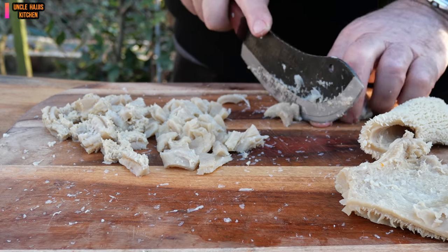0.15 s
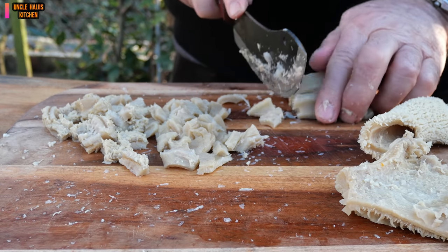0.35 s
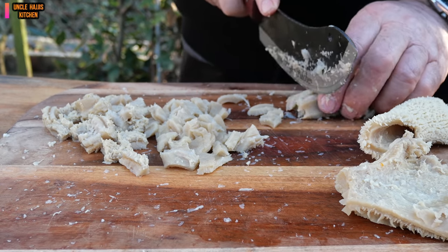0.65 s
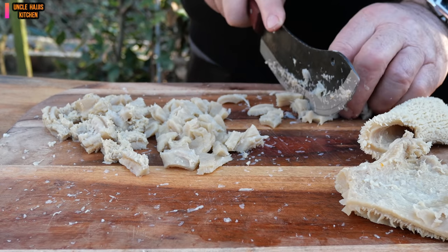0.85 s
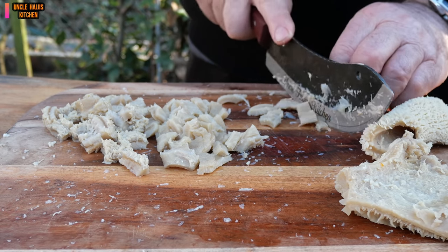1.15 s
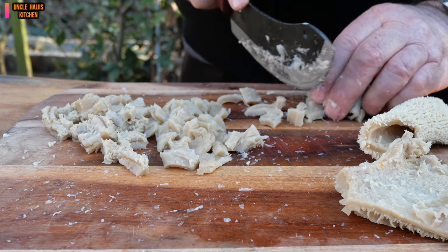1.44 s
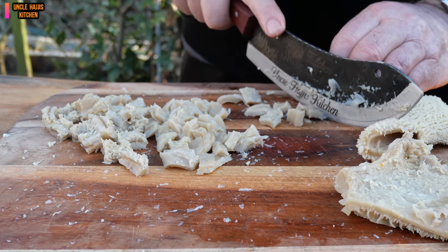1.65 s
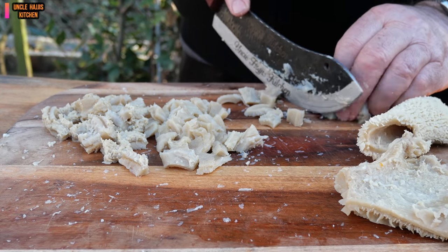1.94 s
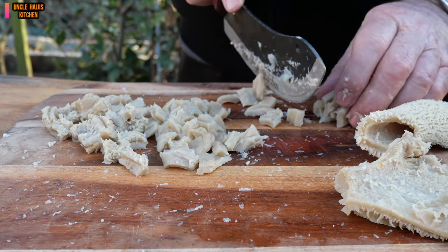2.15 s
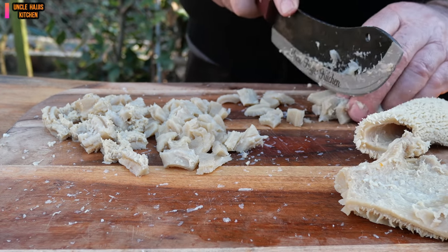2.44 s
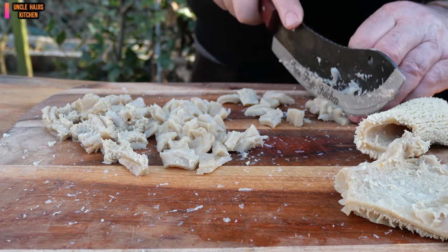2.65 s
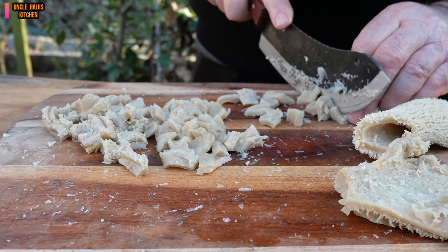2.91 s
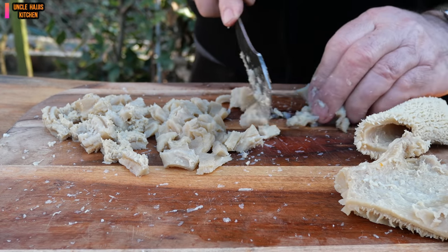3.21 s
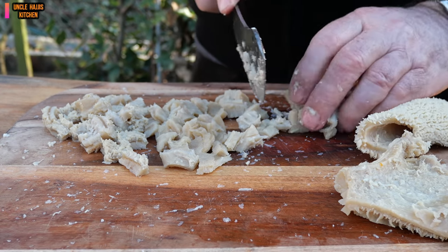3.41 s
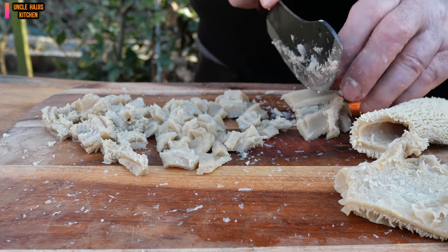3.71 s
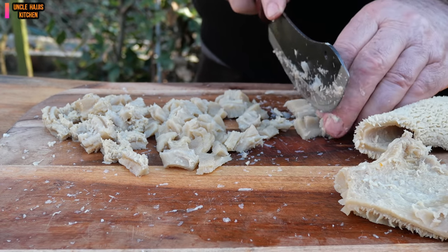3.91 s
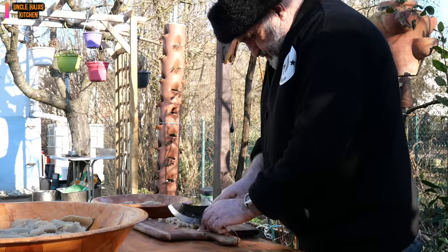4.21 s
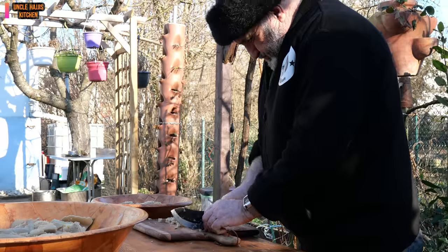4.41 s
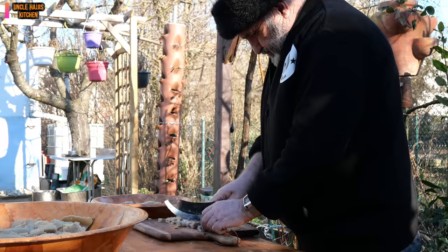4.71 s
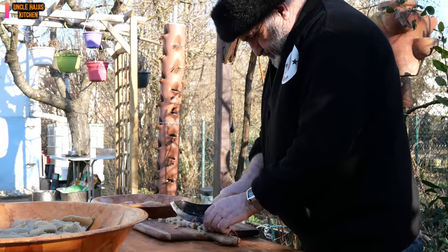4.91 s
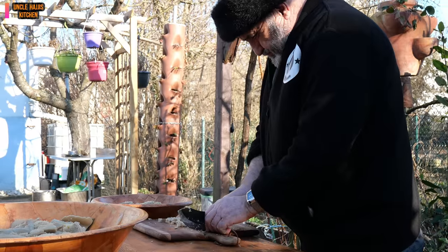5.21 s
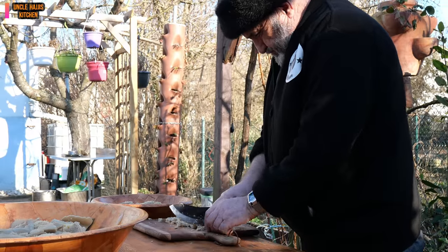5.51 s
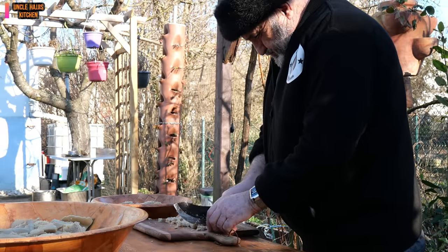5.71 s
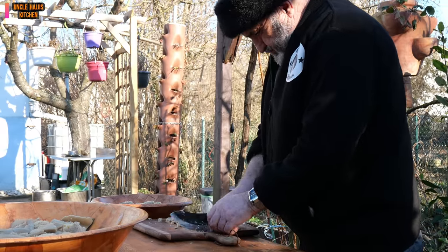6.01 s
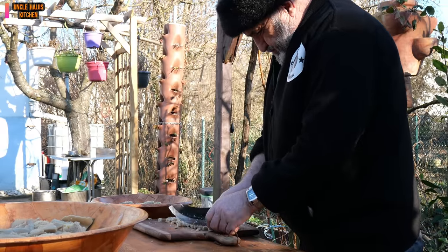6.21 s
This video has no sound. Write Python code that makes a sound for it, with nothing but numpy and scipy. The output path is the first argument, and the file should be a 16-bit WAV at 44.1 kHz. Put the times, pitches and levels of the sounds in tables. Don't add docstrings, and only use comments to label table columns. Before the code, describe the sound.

Close microphone on a chopping board: three sharp wooden knocks with a bright steel crack and a faint wall echo, separated by wet slides, pushed pieces and short scrapes. After about four seconds the perspective moves to the side, where knocks sound hollower and scraping is sparse. Quiet distant traffic and hiss continue throughout; a far vehicle swells softly near the end as the last strong chop lands, followed by a small edge press.

```python
import sys
import numpy as np
from scipy import signal
from scipy.fft import rfft, irfft
from scipy.io import wavfile
from scipy.ndimage import uniform_filter1d

SR = 44100
rng = np.random.default_rng(int(sys.argv[2]) if len(sys.argv) > 2 else 0)


def attenuation_scalar(level_db):
    decades = np.asarray(level_db, float) / 20
    return 10 ** decades


def to_wav(s):
    ch = np.atleast_2d(s).T
    pcm = np.round(np.clip(ch, -1, 1) * 32767)
    wavfile.write(sys.argv[1], SR, pcm.astype(np.int16))


N = 280035
T = np.arange(N) / SR
MOVE_S = 4.12


def unit(x):
    return x / np.sqrt(np.mean(x ** 2))


def white():
    return rng.standard_normal(N)


def colour(x, points):
    hz, db = np.transpose(points)
    log_hz = np.log(np.fft.rfftfreq(N, 1 / SR) + 1)
    gain = attenuation_scalar(np.interp(log_hz, np.log(hz), db))
    return irfft(rfft(x) * gain, N)


def band(x, lo_hz, hi_hz):
    sos = signal.butter(3, [lo_hz, hi_hz], "bandpass", fs=SR, output="sos")
    return signal.sosfilt(sos, x)


def resonate(x, hz, width_hz):
    return signal.lfilter(*signal.iirpeak(hz, hz / width_hz, fs=SR), x)


def walk(rate_hz):
    hold = int(SR / rate_hz)
    steps = np.repeat(rng.standard_normal(N // hold + 1), hold)
    return unit(uniform_filter1d(uniform_filter1d(steps, hold), hold)[:N])


def late(x, t, ms):
    return np.interp(t - ms / 1000, t, x, left=0)


def add(out, sound, s):
    i = int(s * SR)
    out[i:i + len(sound)] += sound[:N - i]


# pitch_hz, level_db (per Hz)
TRAFFIC_COLOUR = [(24, -88), (40, -56), (97, -32), (134, -22), (171, -14), (227, -11.5), (400, -2),
                  (553, -1), (599, -4), (973, -4), (1080, -6), (1370, -10.5), (2140, -24.5), (5000, -31),
                  (6500, -51), (11000, -120)]
# pitch_hz, level_db (per Hz)
HISS_COLOUR = [(1470, -34.5), (2500, -4.5), (2880, -13.5), (3600, -6), (4080, -9.5), (4410, -5), (5110, -6),
               (6550, 7), (8600, 0.5), (14800, 4), (16000, 2)]
# low_traffic_db, upper_traffic_db, hiss_db
YARD_CLOSE = (-68.5, -68.5, -74)
YARD_SIDE = (-65.5, -70, -73.5)
# time_s, level_db
ENGINE = [
    (4.13, -92),
    (4.6, -88),
    (5.5, -79),
    (5.6, -66.5),
    (5.749, -73),
    (6.099, -66),
    (6.35, -79),
]


def garden():
    close = T < MOVE_S
    low_db, upper_db, hiss_db = (np.where(close, a, b) for a, b in zip(YARD_CLOSE, YARD_SIDE))
    low_db = low_db + 6.5 * np.exp(-((T - 6.08) / 0.31) ** 2)
    engine_db = np.interp(T, *np.transpose(ENGINE))

    far, far_side = (colour(white(), TRAFFIC_COLOUR) for _ in range(2))
    low = attenuation_scalar(low_db + 0.53 * walk(6)) / np.std(band(far, 141, 754))
    upper = attenuation_scalar(upper_db + 2.08 * walk(8.3)) / np.std(band(far, 800, 1400))
    traffic, traffic_side = [low * band(v, 30, 880) + upper * band(v, 680, 5900) for v in (far, far_side)]

    drone = attenuation_scalar(low_db - 8.0 + 2.0 * walk(3.0)) * unit(resonate(white(), 415, 66)) * (T >= MOVE_S)
    engine = attenuation_scalar(engine_db + 2.0 * walk(4.5)) * unit(resonate(white(), 274, 33))
    gust_db = np.where(close, -108, -99)
    gusts = [attenuation_scalar(gust_db + 4.0 * walk(8)) * unit(band(white(), 30, 200)) for _ in range(2)]
    hiss = [attenuation_scalar(hiss_db + 1.4 * walk(25)) * unit(colour(white(), HISS_COLOUR)) for _ in range(2)]

    mid = traffic + drone + engine + gusts[0] + attenuation_scalar(-1.77) * hiss[0]
    side = attenuation_scalar(np.where(close, -20, -35)) * traffic_side + attenuation_scalar(-4) * (hiss[1] + gusts[1])
    return mid, side


# time_s, peak_db, pitch_hz
TICKS = [(0.0114, -51.5, 11200), (0.0334, -60, 6560), (0.3127, -49, 6600), (0.6015, -52.5, 8000),
         (0.6275, -64, 6590), (0.653, -59, 6680), (0.8494, -53.5, 7350), (1.0311, -61, 14800),
         (1.2431, -52, 6580), (1.6462, -63, 10600), (1.7928, -57, 6980), (2.0936, -42, 10600),
         (2.1251, -59, 12800), (2.2503, -56, 14200), (2.4498, -59, 13700), (2.4668, -49, 12400),
         (2.5257, -56, 13900), (2.6466, -51.5, 7130), (2.698, -53, 6300), (2.7222, -48, 6700),
         (2.7711, -45.5, 13450), (3.024, -36.5, 10600), (3.4665, -62, 13100), (3.484, -53.5, 12400),
         (3.5014, -50, 13500), (3.5932, -54.5, 7360), (3.6094, -53, 14700), (3.6564, -51, 13230),
         (3.6794, -69, 7110), (4.1071, -47.5, 15300)]


def ticks():
    out = np.zeros(N)
    t = T[:1800] - .015
    snap_shape = (t >= 0) * np.exp(-np.abs(t) / 0.0017)
    fizz_shape = attenuation_scalar(-17.5) * np.exp(-(t / 0.028) ** 2)
    for s, db, hz in TICKS:
        noise = rng.standard_normal(len(t)) * (snap_shape + fizz_shape)
        tick = resonate(noise, hz, .5 * hz)
        add(out, attenuation_scalar(db - 5.5) * tick / np.abs(tick).max(), max(s - .015, 0))
    return out


def stroke_power(strokes, shape):
    rise, end_db, roundness, steel_db = shape
    power = np.zeros((4, N))
    for s, length_s, db, bite_db, hiss_db in strokes:
        away = np.where(T < s, (s - T) / rise, (T - s) / (1 - rise)) / length_s
        force = attenuation_scalar(db - end_db * np.minimum(away, 3) ** roundness)
        range_db = np.array([[0], [bite_db], [hiss_db], [hiss_db - 6.5]])
        power = power + (force * attenuation_scalar(range_db)) ** 2
    steel_share = attenuation_scalar(steel_db) ** 2
    return np.array([power, power * steel_share]) / (1 + steel_share)


# pitch_hz, level_db (per Hz)
RASP_COLOUR = [(240, -66), (400, -16.5), (606, -8), (644, -21.5), (740, 0.5), (824, -9.5), (1050, -5.5),
               (1170, -8), (1860, -18), (2610, 1), (4270, -14.5), (5060, -24.5), (7790, -23), (14900, -55),
               (15800, -42)]
# pitch_hz, width_hz, level_db
BLADE_CLOSE = [(751, 52, -4), (1020, 29, -5.5), (1188, 40, -1.5), (1366, 92, 3), (1550, 90, -4.5),
               (1980, 39, -34), (2627, 79, 8.5), (3120, 70, -6.5), (4100, 130, -3.5), (5227, 42, 6),
               (6620, 140, 4.5), (7700, 55, 2), (9060, 60, 2), (10600, 240, -1.5), (12020, 57, 6),
               (13400, 220, -18), (14340, 230, -12)]
BLADE_SIDE = [(783, 14, -3), (1087, 41, 5), (1523, 39, -20.5), (2316, 22, 12.5), (2800, 110, 12.5),
              (4000, 76, 2.5), (4650, 63, 5), (5150, 90, 10), (6410, 110, 24), (7350, 45, 16),
              (9200, 60, -64), (10740, 66, -68)]
SLIDES = [
    (0.254, .22, -54.5, -4.5, -8.5),
    (1.156, 0.21, -58.5, -1.5, -5.5),
    (3.03, .22, -57.5, -1, -4),
    (3.315, 0.21, -69.5, -5.5, -17),
    (4.625, 0.18, -69.5, -6.5, -3.5),
]
SWEEPS = [
    (1.348, 0.19, -51.5, -6.5, -16.5),
    (2.021, 0.18, -50.5, -12, -14),
]
SCRAPES = [
    (1.424, 0.039, -48.5, -9, -10),
    (3.192, 0.067, -55.5, 1, -7),
    (3.234, 0.04, -48, -7, -6.5),
]
FLICKS = [
    (0.353, 0.083, -54, -25, -8.5),
    (2.098, 0.035, -56.5, -6, 0),
    (4.706, .055, -43.5, -14.5, -21.5),
]
NUDGES = [
    (5.453, 0.07, -48, -17.5, -24),
    (6.176, 0.057, -43.5, -12, -15.5),
]
# rise (share of length), end_loss_db, roundness (exponent), steel_over_rasp_db
SLIDE_SHAPE = (.55, 25.5, 2.5, -9.5)
SWEEP_SHAPE = (0.54, 17.5, 1.74, 2)
SCRAPE_SHAPE = (0.43, 11, 2.4, 12.5)
FLICK_SHAPE = (0.27, 24, 0.76, 6)
NUDGE_SHAPE = (0.49, 22, 1.2, 11.6)


def drags():
    grain_size = attenuation_scalar(1.94 * rng.exponential(size=N))
    grains = unit(white() * grain_size * attenuation_scalar(1.2 * walk(150)))
    wet = colour(grains, RASP_COLOUR)
    kinds = [(SLIDES, SLIDE_SHAPE), (SWEEPS, SWEEP_SHAPE), (SCRAPES, SCRAPE_SHAPE),
             (FLICKS, FLICK_SHAPE), (NUDGES, NUDGE_SHAPE)]
    rasp, steel = np.sqrt(sum(stroke_power(*kind) for kind in kinds))
    out = np.zeros(N)
    edges_hz = (400, 1900, 5000, 10000, 15800)
    for lo, hi, rasp_level, steel_level in zip(edges_hz[:-1], edges_hz[1:], rasp, steel):
        out += rasp_level * unit(band(wet, lo, hi))
        for blade, here in ((BLADE_CLOSE, T < MOVE_S), (BLADE_SIDE, T >= MOVE_S)):
            modes = [m for m in blade if lo < m[0] < hi]
            power = sum(width * attenuation_scalar(db) ** 2 for hz, width, db in modes) * np.pi / SR
            drive = grains * steel_level * here / np.sqrt(power)
            for hz, width, db in modes:
                out += resonate(drive * attenuation_scalar(db + 2.8 * walk(14)), hz, width)
    return out


# low_hz, high_hz
SPOT_RANGES = [(0, 700), (900, 1550), (1550, 2200), (2200, 9000)]


def blow(t, spot_db, modes, rise_ms, table_db, free, settle_ms):
    hz, db, t60_s = np.transpose(modes)[:, :, None]
    for favour_db, (lo, hi) in zip(spot_db, SPOT_RANGES):
        db = db + favour_db * ((hz > lo) & (hz < hi))
    sign = (-1) ** np.arange(len(modes))[:, None]
    swell = (1 - np.exp(-t * hz / (rise_ms * .8))) ** 2
    decay = np.exp(-np.log(1000) * t / (free * t60_s))
    ring = np.sum(sign * attenuation_scalar(db) * swell * np.sin(2 * np.pi * hz * t) * decay, axis=0)
    ring = ring / np.sqrt(1 + (1000 * t / settle_ms) ** 4)
    ring = ring + attenuation_scalar(table_db) * late(ring, t, 2.1)
    knock = band(band(ring, 300, 9000), 200, 12000)
    return knock / np.abs(knock).max()


# low_db, middle_db, high_db
CHOPS = [
    (0.9773, -18.5, 4.5, 7.5, 12),
    (1.8586, -15, 1.5, -4, 0),
    (2.815, -7, .5, 3.5, 8),
    (4.4868, -13.5, 2.5, -1, -3),
    (5.1934, -17, 1, -8, 0),
    (5.7865, -35, 0, 0, 0),
    (5.954, -10, 4, 3, 1),
    (6.108, -53, -15, -12, 5),
]
# pitch_hz, level_db, t60_s
BOARD_CLOSE = [(316, -27, .09), (440, -8, .08), (598, -1.5, .058), (795, 5.5, .037), (1018, -7, .075),
               (1200, -6.5, .03), (1350, -11, .055), (1500, -10.5, .015), (1655, -22, .026),
               (2000, -25.5, .02), (2305, -33, .03), (2600, -20, .022), (3250, -37, .025),
               (4600, -40, .015)]
BOARD_SIDE = [(300, -20, .09), (495, -4, .04), (752, 3, .05), (962, 5.5, .022), (1140, 1, .03),
              (1420, -28, .04), (1686, -18, .06), (1850, -30, .04), (2100, -33, .03)]
BOARD_RIM = [(415, 0, .04), (530, -5, .07), (757, -3, .06), (840, 3, .02), (1030, -8, .06),
             (1235, 3.5, .04), (1671, -4, .05), (1925, -14, .025), (2325, -11, .016), (2850, -22, .02)]
# delay_ms, level_db
ECHO_CLOSE = [(16.5, -17.5), (27, -41), (41, -27.5)]
ECHO_SIDE = [(16.5, -14), (29, -20), (45, -25)]
# swell_ms, table_reflection_db, free_ring_stretch (factor), settle_ms
SEAT_CLOSE = (.5, -40, 1.3, 13)
SEAT_SIDE = (.9, 5, 1.1, 24)


def chops():
    mid, side, t = np.zeros(N), np.zeros(N), T[:SR // 2]
    for s, db, *spot_db in CHOPS:
        close = s < MOVE_S
        rim = db < -30
        spot_db = [*spot_db, close * (1.75 * spot_db[-1] - 13)]
        modes = BOARD_CLOSE if close else BOARD_RIM if rim else BOARD_SIDE
        knock = blow(t, spot_db, modes, *(SEAT_CLOSE if close or rim else SEAT_SIDE))
        noise = rng.standard_normal((4, len(t)))

        slap = close * attenuation_scalar(-16) * np.exp(-((t - .028) / 0.03) ** 2)
        steel = np.exp(-t / 0.0029) + slap
        crack = attenuation_scalar(-39 if close else -52) * band(noise[0], 2800, 12000) * steel
        thump = attenuation_scalar(-58) * np.exp(-t / .002) * np.sqrt(t / .002)
        echoes = sum(attenuation_scalar(echo_db) * band(late(knock, t, ms), 482, 1600)
                     for ms, echo_db in (ECHO_CLOSE if close else ECHO_SIDE))

        short = knock[:400] * np.hanning(800)[400:]
        wash = attenuation_scalar(-22 if close else -13) * np.exp(-t / .06)
        fade = (1 - np.exp(-t / .006)) * (np.exp(-t / .016) + wash)
        tail, tail_side = [np.convolve(n * fade, short)[:len(t)] for n in noise[1:3]]
        tail_db = -38 if close else -30 if rim else -35

        sinking = np.convolve(noise[3, :1300] * np.exp((t[:1300] - .03) / .008), short)
        add(mid, attenuation_scalar(db - 40.5) * sinking, s - .031)
        add(mid, attenuation_scalar(db) * (knock + crack + thump + echoes + attenuation_scalar(tail_db) * tail), s)
        knock_side = attenuation_scalar(-24 if close else -32) * late(knock, t, .4)
        add(side, attenuation_scalar(db) * (knock_side + thump + attenuation_scalar(-79.0) * tail_side), s)
    return mid, side


def scene():
    air, air_side = garden()
    snap, rub = ticks(), drags()
    knock, knock_side = chops()
    mid = knock + rub + snap + air
    rub_side = attenuation_scalar(-20) * late(rub, T, .2) + attenuation_scalar(-11) * late(band(rub + snap, 4000, 16000), T, 3.0)
    side = knock_side + rub_side + air_side
    octaves_hz = 31 * 2 ** np.arange(9)
    side = sum(attenuation_scalar(4.0 * walk(14) - 2) * band(side, hz, 2 * hz) for hz in octaves_hz)
    return np.array([mid + side, mid - side])


def low_pass(x):
    return signal.sosfilt(signal.butter(12, 16370, fs=SR, output="sos"), x)


def record(dry):
    top_cut = signal.ellip(10, .2, 70, 16150, fs=SR, output="sos")
    mix = signal.sosfilt(top_cut, dry)
    return low_pass(mix)


dry = scene()
out = record(dry)
to_wav(out)
```